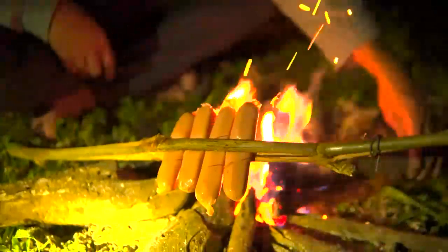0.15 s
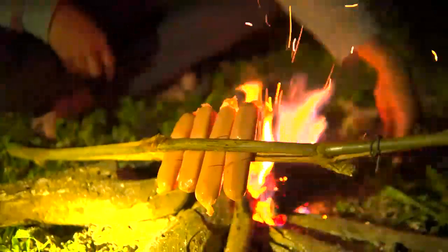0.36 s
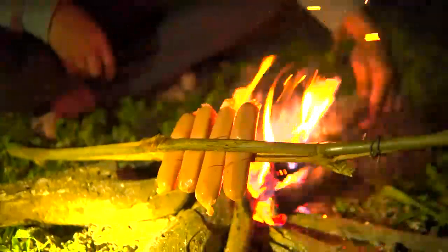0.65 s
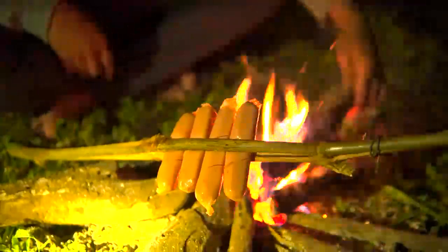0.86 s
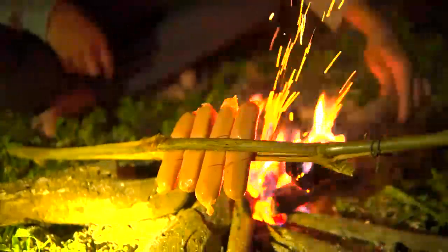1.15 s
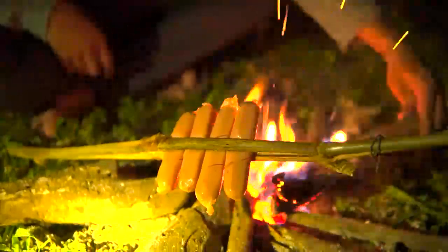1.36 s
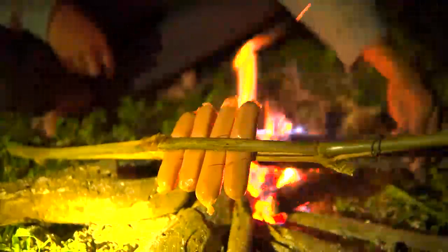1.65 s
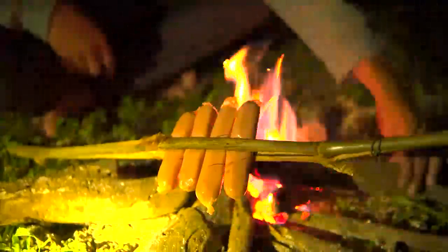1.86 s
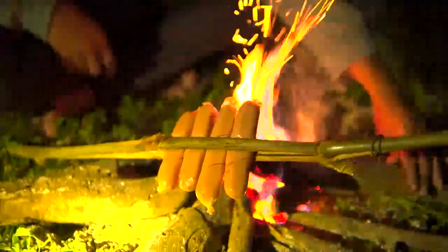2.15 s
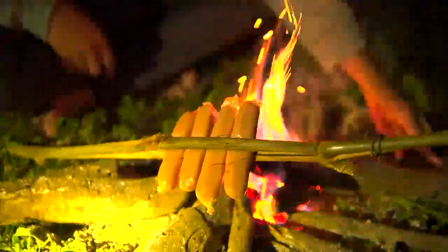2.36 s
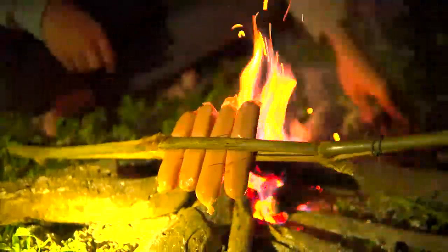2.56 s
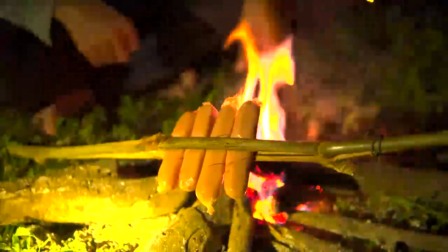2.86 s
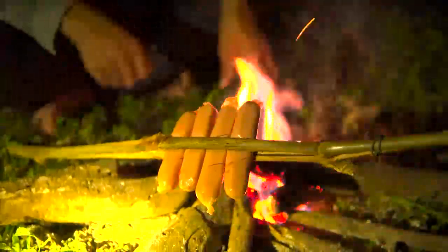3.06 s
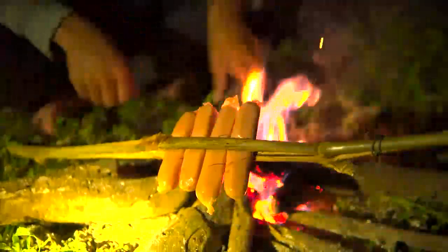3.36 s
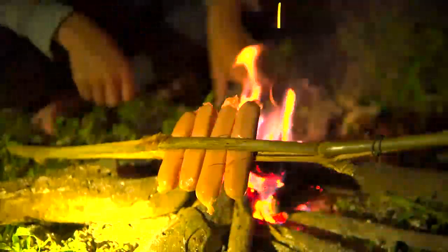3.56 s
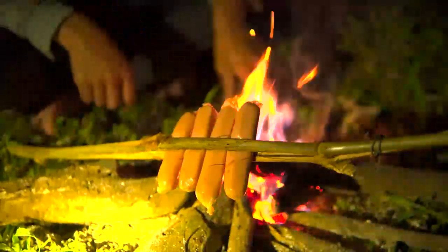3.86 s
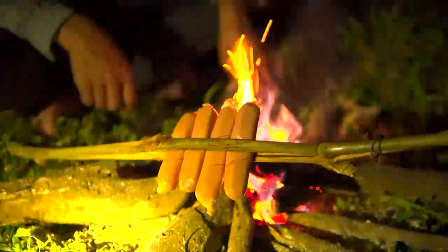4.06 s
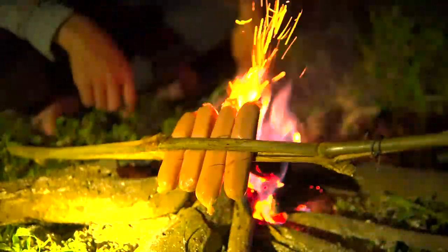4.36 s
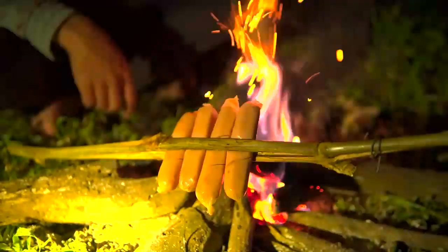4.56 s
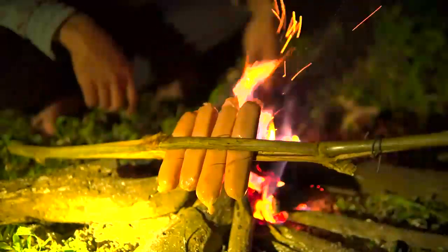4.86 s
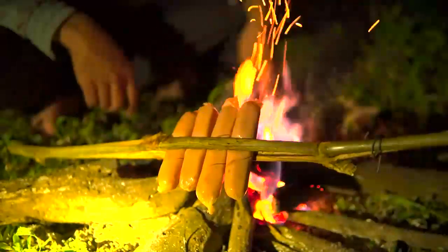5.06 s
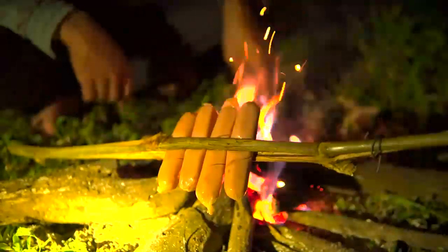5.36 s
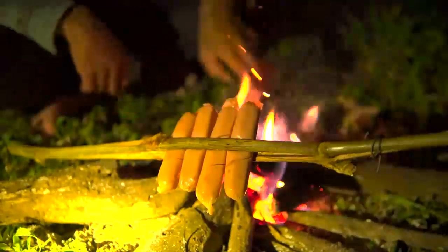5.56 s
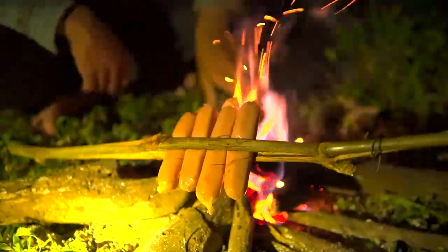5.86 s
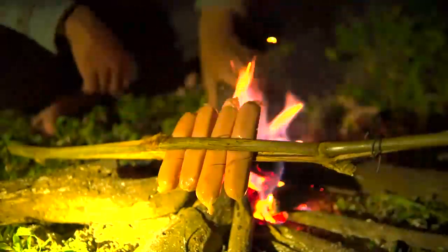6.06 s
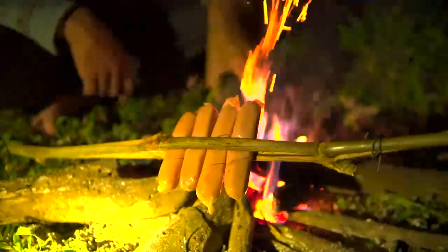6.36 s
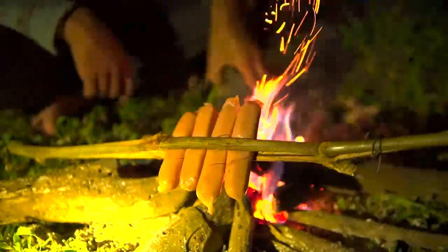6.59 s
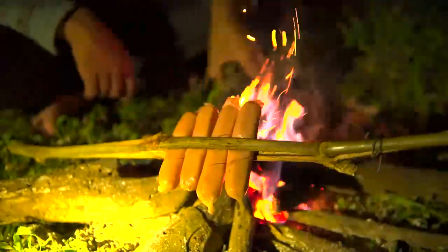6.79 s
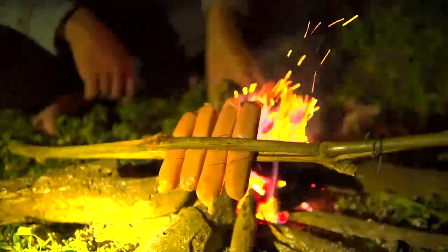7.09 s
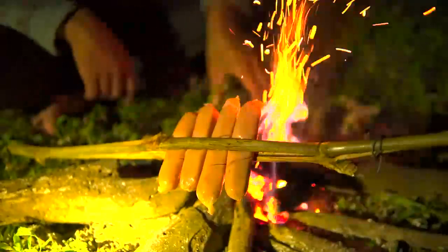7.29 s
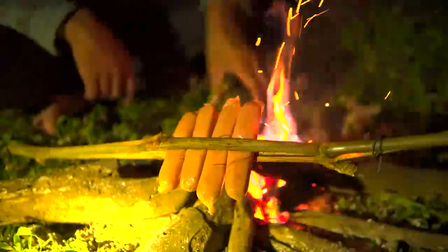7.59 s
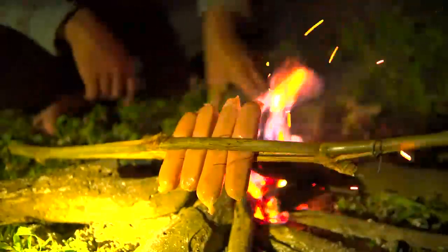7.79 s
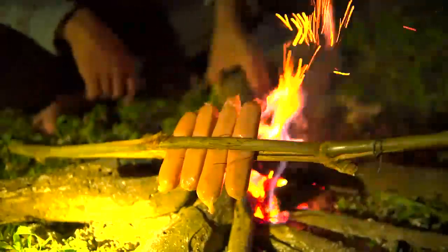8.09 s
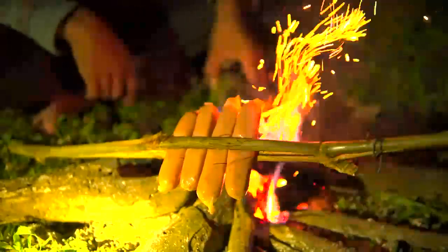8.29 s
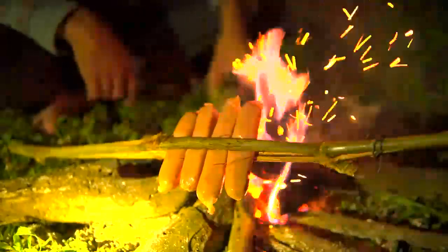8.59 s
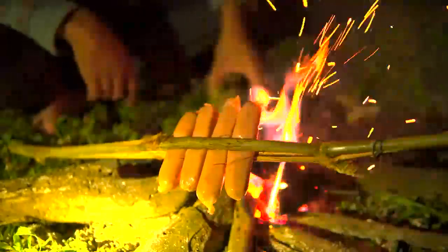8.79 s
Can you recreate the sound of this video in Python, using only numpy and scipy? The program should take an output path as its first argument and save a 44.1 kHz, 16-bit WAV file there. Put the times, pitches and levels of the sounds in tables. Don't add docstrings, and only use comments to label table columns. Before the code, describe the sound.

Small campfire hissing and popping outdoors at night, twigs knocking and sharp snaps flaring up over a continuous pulsing chorus of crickets.

```python
import sys
import numpy as np
from scipy import signal
from scipy.fft import rfft, irfft, next_fast_len
from scipy.io import wavfile
from scipy.ndimage import uniform_filter1d, map_coordinates

SR = 44100
rng = np.random.default_rng(int(sys.argv[2]) if len(sys.argv) > 2 else 0)


def transcribe(u):
    v = np.clip(np.atleast_2d(u).T, -1, 1)
    q = np.round(v * 32767).astype(np.int16)
    wavfile.write(sys.argv[1], SR, q)


def nominal_scale(level):
    x = np.asarray(level, float) / 20
    return 10 ** x


N = 393813
T = np.arange(N) / SR


def unit(x):
    return x / np.sqrt(np.mean(x ** 2) + 1e-20)


def along(points, hz):
    point_hz, point_db = np.transpose(points)
    return np.interp(np.log(hz + 1), np.log(point_hz + 1), point_db)


def curves(rows):
    start_s, *columns = np.transpose(rows)
    return [np.interp(T, start_s, column) for column in columns]


def wobble(rate):
    knots = rng.standard_normal(int(N * rate / SR) + 4)
    return map_coordinates(knots, [T * rate], order=1)


def coloured(x, spectrum):
    size = next_fast_len(N + 8192)
    gain = nominal_scale(along(spectrum, np.fft.rfftfreq(size, 1 / SR)))
    return unit(irfft(rfft(x, size) * gain, size)[..., :N])


def pair(alike):
    a, b = rng.standard_normal((2, N))
    turn = np.arccos(np.clip(alike, 0, 1)) / 2
    shared, apart = np.cos(turn) * a, np.sin(turn) * b
    return np.array([shared + apart, shared - apart])


def strokes(beat, hz, fall_hz, duty, rough_hz, overtone=2, overtone_db=-40):
    along_stroke = np.clip(beat % 1 / duty, 0, 1)
    stroke_number = np.cumsum(np.diff(beat % 1, prepend=0) < 0)
    tune, size, phase = rng.standard_normal((3, 1024))[:, stroke_number]
    pitch = hz + rough_hz * tune - fall_hz * (along_stroke - .5)
    angle = 2 * np.pi * (np.cumsum(pitch) / SR + phase)
    tone = np.sin(angle) + nominal_scale(overtone_db) * np.sin(overtone * angle)
    return nominal_scale(0.61 * size) * np.sin(np.pi * along_stroke) * tone


def chirps(rows, duty):
    beat, gain = np.zeros(N), np.zeros(N)
    for start_s, rate, stroke_db in rows:
        here = (T - start_s) * rate + duty / 2
        on = slice(*np.searchsorted(here, [0, len(stroke_db)]))
        beat[on] = here[on]
        gain[on] = nominal_scale(np.array(stroke_db))[here[on].astype(int)]
    return beat, gain


def swelling(db, count, start_db):
    return db + start_db * .5 ** np.arange(count) + rng.normal(0, 0.12, count)


def placed(x, pan_db, lag, wet_db, t60):
    block = 8192
    tails = rng.standard_normal((12, 2, block)) * nominal_scale(-60 * np.arange(block) / SR / t60)
    tails = rfft(tails / np.linalg.norm(tails, axis=2, keepdims=True), 3 * block)
    count = N // block + 2
    halves = np.pad(x, (block, count * block - N)).reshape(-1, block)
    window = np.sin(np.pi * np.arange(2 * block) / (2 * block))
    pieces = np.hstack([halves[:-1], halves[1:]]) * window
    echoes = irfft(rfft(pieces, 3 * block)[:, None] * tails[np.arange(count) % 12], 3 * block)
    wet = np.zeros((2, count + 2, block))
    for k in range(3):
        wet[:, k:k + count] += echoes[..., k * block:(k + 1) * block].swapaxes(0, 1)
    wet = wet.reshape(2, -1)[:, block:block + N]
    direct = np.array([np.roll(x, round(lag)) * nominal_scale(pan_db / 2), x * nominal_scale(-pan_db / 2)])
    return direct + nominal_scale(wet_db) * wet


# third_stroke_s, end_s, level_db
TREE_CHIRPS = [(0.215, .499, -44.5), (1.069, 1.282, -44), (2.202, 2.534, -45), (3.26, 3.497, -44.5),
               (4.091, 4.278, -45), (4.828, 5.019, -45), (5.477, 5.76, -45.5), (6.3046, 6.443, -44),
               (6.993, 7.325, -46), (8.099, 8.288, -43.5)]


def tree_cricket():
    rate = 41.8
    rows = []
    for third_s, end_s, db in TREE_CHIRPS:
        count = int((end_s - third_s) * rate + 2.6)
        rows.append((third_s - 2 / rate, rate, swelling(db - 0.6, count, -9.0)))
    beat, gain = chirps(rows, duty=0.732)
    song = gain * strokes(beat, 2410, fall_hz=210, duty=.78, rough_hz=6, overtone=3, overtone_db=-20)
    return placed(song, pan_db=-10, lag=0, wet_db=-4, t60=.15)


# third_stroke_s, level_db
FIELD_CHIRPS = [(0.24, -44), (0.565, -41), (0.8838, -41.5), (1.2237, -43), (1.5506, -42), (1.8563, -40.5),
                (2.163, -42.5), (2.4902, -45), (2.8246, -43), (3.157, -44), (3.492, -43.5), (3.8198, -42.5),
                (4.147, -42.5), (4.473, -42), (4.811, -43), (5.1612, -42), (5.4874, -43), (5.8127, -41),
                (6.156, -44), (6.485, -43), (6.821, -42), (7.169, -45), (7.4996, -42.5), (7.8388, -42),
                (8.1453, -46), (8.5034, -43), (8.821, -42.5)]
FIELD_STROKES = [-3.5, -2, 1, 1, 0, -20]


def field_cricket():
    rate = 38
    rows = [(s - 2 / rate + .003, rate, db - 8 + np.array(FIELD_STROKES)) for s, db in FIELD_CHIRPS]
    beat, gain = chirps(rows, duty=.55)
    pitch_hz = 3720 + 130 * np.minimum(beat // 1, 2)
    song = gain * strokes(beat, pitch_hz, fall_hz=1000, duty=0.72, rough_hz=40)
    return placed(song, pan_db=-12, lag=4, wet_db=2, t60=.22)


# first_stroke_s, level_db, stroke_count
BUSH_CHIRPS = [(-.04, -52.5, 7), (0.326, -53.5, 6), (0.699, -55, 7), (1.068, -56, 7), (1.454, -54, 7),
               (1.795, -56, 6), (2.126, -52.5, 7), (2.474, -55, 7), (2.944, -55.5, 5), (3.534, -54.5, 7),
               (3.971, -57, 6), (4.334, -55.5, 7), (4.679, -53.5, 7), (5.04, -53.5, 7), (5.439, -56, 6),
               (5.769, -58, 7), (6.122, -54.5, 7), (6.462, -55, 8), (6.83, -55, 7), (7.18, -55, 8),
               (7.56, -54.5, 7), (7.935, -55.5, 6), (8.249, -55, 7), (8.619, -54.5, 7)]


def bush_cricket():
    rate = 38.6
    rows = [(s, rate, swelling(db + 2.0, round(count), -4.0)) for s, db, count in BUSH_CHIRPS]
    beat, gain = chirps(rows, duty=0.67)
    pitch_hz = 3820 + 25 * np.minimum(beat // 1, 3)
    song = gain * strokes(beat, pitch_hz, fall_hz=420, duty=.75, rough_hz=28, overtone_db=-24)
    song = song + .6 * np.roll(song, round(SR / rate / 2))
    return placed(song, pan_db=-13, lag=1, wet_db=-1, t60=.24) * nominal_scale([[-1], [3]])


# first_stroke_s, level_db
SHRILL_CHIRPS = [(0.061, -66), (0.339, -65), (0.647, -68), (0.972, -55), (1.281, -62), (1.59, -63),
                 (1.904, -68), (2.204, -65), (2.496, -61), (2.81, -70), (3.111, -60), (3.419, -64),
                 (3.745, -62), (4.052, -59), (4.367, -58), (4.682, -64), (4.992, -67), (5.309, -62),
                 (5.615, -65), (5.89, -68), (6.199, -68), (6.51, -65), (6.824, -69), (7.135, -65),
                 (7.471, -59), (7.782, -66), (8.091, -63), (8.379, -61), (8.688, -62)]
SHRILL_STROKES = [-5, 0, 0, 4, 0, 1, 1]


def shrill_cricket():
    rows = [(s, 50, db + 2 + np.array(SHRILL_STROKES)) for s, db in SHRILL_CHIRPS]
    beat, gain = chirps(rows, duty=.6)
    song = gain * strokes(beat, 7240, fall_hz=120, duty=.6, rough_hz=25)
    return placed(song, pan_db=-.6, lag=0, wet_db=-4, t60=.15)


# start_s, level_db
KATYDID_LEVEL = [(0, -56), (.15, -58), (1.2, -57), (2.3, -60), (2.55, -69), (4.5, -65), (5.1, -55.5),
                 (6.5, -60), (8.1, -57.5), (8.45, -67), (8.93, -75)]


def katydid():
    level_db, = curves(KATYDID_LEVEL)
    beat = np.cumsum(81 + .5 * wobble(2)) / SR
    song = strokes(beat, 6710, fall_hz=301.3, duty=0.63, rough_hz=70.2)
    song = nominal_scale(level_db + 1.4 * wobble(11)) * song
    return placed(song, pan_db=-9, lag=2, wet_db=3, t60=.2) * nominal_scale([[-2], [2]])


# start_s, burn_db
BURNING = [(0.0, 3.5), (0.27, 4), (0.62, 4.5), (0.87, 8), (1.3, 2.5), (2.44, 2), (2.9, 5), (3.63, 1.5),
           (4.03, 2), (4.35, 0.5), (4.65, 6.5), (5.22, 6), (5.8, 1), (6.37, 5.5), (6.8, 2), (7.6, 2),
           (8.1, 5), (8.93, 5)]
# middle_s, half_length_s, extra_sizzle_db, rustle_db
FLARE_UPS = [(.2, 0.1, 5, 3.5), (1.812, 0.018, 14.5, 4.5), (1.946, 0.062, 6, 2), (2.925, 0.11, 2, 5),
             (3.867, 0.033, 2, 4), (4.054, 0.17, 13.5, 5), (4.126, 0.05, 3, -5), (4.366, 0.093, 9, 4),
             (4.807, 0.055, 3, 1), (5.153, 0.022, -2, 5), (5.195, 0.043, -7, 5.5), (5.273, 0.069, 3, 3.5),
             (6.432, 0.044, 3.5, 5), (7.075, 0.041, 7, 9), (7.18, 0.12, 3.5, 4), (7.951, 0.079, 3, 2.5),
             (8.083, 0.15, 2, 5.5), (8.438, 0.044, 0, 5.5), (8.588, 0.067, -11, 6.5)]
# pitch_hz, level_db (per Hz)
SIZZLE_COLOUR = [(800, -50), (2000, 7.5), (3300, 7), (5700, -1.5), (7500, 3.5), (9000, 3), (12000, 1.5),
                 (14000, -0.5)]
# pitch_hz, level_db (per Hz)
RUSTLE_COLOUR = [(300, -49), (600, -4), (1100, 6), (1700, 4), (2500, 4), (4000, -5)]
# pitch_hz, level_db (per Hz)
FLAME_COLOUR = [(15, -58), (25, -46.5), (237, -18), (280, -18), (332, -10.5), (510, -7.5), (651, -4),
                (800, -3.5), (1790, -5.5), (2200, 0), (2860, -7.5), (4840, -120)]


def fire():
    burn_db, = curves(BURNING)
    sizzle_db = -63 + burn_db
    flame_db = -59.5 + 0.47 * burn_db
    rustle_gain = np.zeros(N)
    for middle_s, half_s, hiss_db, rustle_db in FLARE_UPS:
        flare = np.exp(-np.abs((T - middle_s) / half_s) ** 2.6)
        sizzle_db = sizzle_db + hiss_db * flare
        rustle_gain = rustle_gain + nominal_scale(3.72 * rustle_db - 75.5) * flare
    sparks = (rng.random(N) < 900 / SR) * nominal_scale(3.6 * np.minimum(rng.exponential(1, N), 4.5))
    grit = uniform_filter1d(sparks, size=30) * pair(alike=1.0)
    sizzle = coloured(pair(alike=1.0) + nominal_scale(-4.5) * unit(grit), SIZZLE_COLOUR)
    rustle = coloured(pair(alike=0.9) * nominal_scale(4.3 * wobble(120)), RUSTLE_COLOUR)
    flame = coloured(pair(alike=0.16) * nominal_scale(0.79 * wobble(25)), FLAME_COLOUR) * nominal_scale([[.5], [-.5]])
    return nominal_scale(sizzle_db + 2.5 * wobble(30)) * sizzle + rustle_gain * rustle + nominal_scale(flame_db) * flame


# pitch_hz, level_db (per Hz)
STEAM_COLOUR = [(350, -65), (1050, -9), (1800, -6), (3100, -1), (4600, 2), (9000, 1)]


def pops(rows, rise_s, fall_s, ragged_db, ring):
    out = np.zeros((2, N + 4096))
    t = np.arange(2048) / SR
    hz = np.fft.rfftfreq(len(t), 1 / SR)
    for start_s, db, top_db, wood_hz, wood_db in rows:
        steam = nominal_scale(along(STEAM_COLOUR + [(12000, top_db + 5.5), (14000, top_db - .6)], hz))
        wood = nominal_scale(wood_db - 29 * np.log2((hz + 1) / wood_hz) ** 2)
        colour = np.hypot(steam, wood)
        rough = np.hypot(steam, np.sqrt(1 - ring) * wood)
        ripple = nominal_scale(1.5 * np.repeat(rng.standard_normal(33), 32)[:len(hz)])
        a, b = irfft(rfft(rng.standard_normal((2, len(t)))) * rough * ripple, len(t))
        a = a + np.sqrt(2 * ring * np.mean(wood ** 2)) * np.cos(2 * np.pi * wood_hz * (t - rise_s))
        fibres = nominal_scale(ragged_db * np.repeat(rng.standard_normal(64), 32))
        rise = np.minimum(t / rise_s, 1) ** 2
        shape = rise * np.exp(-np.maximum(t - rise_s, 0) / fall_s) * fibres
        strength = np.linalg.norm(shape) * np.sqrt(np.mean(colour ** 2)) / np.linalg.norm(shape * a)
        a, b = a * strength, b * strength
        lean_db = rng.normal(0.37, 1) * np.array([[.5], [-.5]])
        sides = np.array([a + 0.49 * b, a - 0.17 * b]) * nominal_scale(lean_db)
        first = round((start_s - .3 * rise_s) * SR)
        out[:, first:first + len(t)] += nominal_scale(db + 1.5) * shape * sides
    no_bass = signal.butter(4, 450, "high", fs=SR, output="sos")
    return signal.sosfilt(no_bass, out[:, :N])


# start_s, level_db (peak, 9 kHz), top_db (12 kHz over it), wood_hz, wood_db (over it)
SNAP_POPS = [(0.144, -32, -8, 2920, -3), (0.846, -35, -14, 2940, 4), (1.2089, -30.5, 1, 3480, -1),
             (1.7745, -35, -11, 2180, 17), (1.8203, -38, -13, 3300, 2), (1.9287, -46, 5, 3100, 15),
             (3.2955, -54, -16, 3420, 24), (3.318, -56, -10, 1280, 19), (3.8553, -40, -14, 2430, 4),
             (4.0192, -32, -13, 3000, 13), (4.0474, -46, 9, 3000, 5), (4.7527, -29, 1, 2500, 10),
             (4.9002, -42, -1, 3180, 5), (5.1365, -50, -13, 1970, 29.5), (5.1485, -50.5, -9, 1590, 28),
             (5.6114, -40, 0, 3520, 14.5), (6.4065, -47, 1, 2580, 14.5), (6.996, -40.5, -11, 3470, 19),
             (7.0531, -42, -15, 3670, 23.5), (7.0795, -35, -16, 3050, 21.5), (7.9157, -41, -14, 1810, 11.5),
             (8.1268, -37, -22, 3060, 1), (8.5705, -45, 1, 3020, 12), (8.9013, -55, -11, 1100, 11)]
# start_s, level_db (peak, 9 kHz), top_db (12 kHz over it)
TICK_POPS = [(0.2652, -36.5, 5.5), (0.7911, -51, -10), (1.5544, -47, 0), (3.6112, -45, -6),
             (3.8352, -48, -13), (3.9773, -42, -12), (4.296, -43, -11), (4.369, -39, -5), (4.564, -47, -2),
             (4.778, -41, -6), (4.832, -38.5, -9), (4.9358, -45, -1), (5.0444, -50, 8), (6.0566, -42.5, 3),
             (8.2028, -43, -18), (8.332, -48, -15), (8.6383, -43, 1), (8.8069, -50, -6), (8.9168, -31, 8)]


def snaps():
    ticks = [(*tick, 2000, -30) for tick in TICK_POPS]
    return pops(SNAP_POPS + ticks, rise_s=.0017, fall_s=0.0013, ragged_db=-2.5, ring=.5)


# start_s, level_db (peak, 9 kHz), top_db (12 kHz over it), wood_hz, wood_db (over it)
TEAR_POPS = [(0.8375, -37, -7, 2640, 13), (0.9487, -50, -4, 5650, 16), (1.7708, -26.5, -7, 2170, 7.5),
             (1.787, -43.5, -11, 3080, 10), (1.81, -48, -13, 3300, -1), (3.941, -48, -9, 9400, 8),
             (4.078, -39, -4, 1360, 3), (4.1075, -40, -10, 3100, -1), (4.1534, -49, -4, 2020, 3),
             (5.1694, -59, -13, 1390, 24), (6.4507, -49.5, -8, 2580, 15), (6.9905, -37.5, -1, 1915, 14.5),
             (7.0239, -50, -3, 2730, 14), (7.0565, -40, -8, 2220, 15), (7.0763, -30.5, -8, 2200, -15),
             (7.088, -37, -17, 1110, 4), (7.0975, -37, -4, 1820, 6), (7.9602, -55, -16, 1900, 21),
             (8.026, -47, -6, 1810, 13), (8.602, -39, -2.5, 2000, -6), (8.6102, -49.5, -1, 1030, 16.5)]


def tears():
    return nominal_scale(1.0) * pops(TEAR_POPS, rise_s=0.0062, fall_s=0.0045, ragged_db=1.5, ring=0.25)


# start_s, level_db (peak), top_db (12 kHz over it)
SPECK_POPS = [(0.3042, -43, -5), (0.8149, -43, -5), (1.5309, -49, -5), (2.0228, -44, -5), (3.5794, -49, -5),
              (3.903, -49, -5), (3.9244, -45, -5), (3.9944, -37, -5), (4.031, -29, -9), (4.0644, -33, -3),
              (4.0964, -34, -5), (4.1344, -43, -5), (4.6159, -39, -3), (4.6718, -50, -5), (5.0624, -47, -5),
              (5.1307, -42, -5), (5.509, -47, -5), (7.7099, -56, -5), (7.7418, -54, -5), (7.8141, -47, -5),
              (7.8905, -48, -5), (8.4058, -42.5, -5), (8.4487, -44, -3), (8.5505, -42, -9)]


def specks():
    rows = [(*speck, 2000, -30) for speck in SPECK_POPS]
    return nominal_scale(-7) * pops(rows, rise_s=0.0013, fall_s=0.0019, ragged_db=3.5, ring=0)


# start_s, level_db (peak, 9 kHz), top_db (12 kHz over it),
# wood_hz, wood_db (over it)
SPIKE_POPS = [
    (1.7752, -39.5, -8, 2960, 27),
    (7.0802, -32, -14, 3000, 4),
]


def spikes():
    return pops(SPIKE_POPS, rise_s=.0003, fall_s=.0005, ragged_db=.1, ring=.8)


# start_s, level_db (peak), pitch_hz, t60_s (time to fade 60 dB)
TWIG_KNOCKS = [(0.524, -55, 152, 0.028), (.785, -50, 282, 0.018), (0.817, -50, 190, 0.034),
               (.849, -63, 130, 0.027), (0.848, -42, 1127, 0.059), (1.72, -37, 1120, 0.014),
               (2.031, -43, 1130, 0.028), (2.055, -45.5, 1170, 0.036), (1.7, -61, 150, .04),
               (2.09, -62, 170, .04), (2.53, -64, 120, .03), (3.44, -65, 129, .03), (3.16, -57, 140, 0.022),
               (3.61, -57, 192, 0.021), (3.93, -50.5, 1065, 0.17), (4.065, -45.5, 1095, 0.17),
               (4.09, -51, 1100, 0.24), (4.154, -50, 1057, 0.14), (5.14, -46, 632, 0.079),
               (5.139, -45, 1475, 0.039), (5.144, -39, 1750, 0.11), (5.147, -51, 1270, .05),
               (5.192, -50.5, 695, 0.11), (5.205, -45, 1730, 0.071), (5.235, -53.5, 600, 0.075),
               (5.246, -49.5, 1670, .05), (7.084, -30, 1174, 0.037), (7.078, -29, 1650, 0.042),
               (8.129, -45, 1085, 0.041), (8.451, -44, 1890, 0.044), (8.45, -48, 1070, 0.044),
               (8.553, -47, 1060, .04), (8.832, -42, 1124, 0.028), (8.916, -30.5, 1095, 0.035),
               (8.917, -31, 1870, 0.023)]


def knocks():
    out = np.zeros(N + SR)
    t = np.arange(SR // 5) / SR
    for start_s, db, hz, t60 in TWIG_KNOCKS:
        drift = np.cumsum(rng.normal(0, 0.07, len(t)))
        envelope = nominal_scale(db - 60 * t / t60) * (1 - np.exp(-t / 0.0022))
        first = round(start_s * SR)
        out[first:first + len(t)] += (envelope * np.sin(2 * np.pi * hz * t + drift))[:len(out) - first]
    return placed(out[:N], pan_db=-0.5, lag=0, wet_db=-14.5, t60=0.32)


def swells(rows):
    return sum(nominal_scale(db) * np.exp(-((T - middle_s) / half_s) ** 2) for middle_s, half_s, db in rows)


# middle_s, half_length_s, level_db
LOG_SCRAPES = [
    (2.34, .04, -71),
    (2.97, 0.039, -71),
    (3.1, .04, -73),
    (8.31, 0.031, -66),
    (8.38, 0.046, -62.5),
    (8.5, 0.037, -61),
    (8.69, 0.056, -68),
    (8.865, .015, -65),
]
# pitch_hz, level_db (per Hz)
LOG_COLOUR = [(700, -36), (1000, -17), (1130, 11), (1280, -12), (1800, -40)]


def hollow_log():
    hum = coloured(pair(alike=1.0) * nominal_scale(2.1 * wobble(45)), LOG_COLOUR)
    return swells(LOG_SCRAPES) * hum


# middle_s, half_length_s, level_db
STEAM_JETS = [
    (3.33, .12, -70),
    (5.28, 0.098, -57),
    (6.6, 0.071, -64),
    (8.6, .03, -60),
    (8.8, .1, -78),
]
# pitch_hz, level_db (per Hz)
JET_COLOUR = [(5000, -30), (8500, -8), (10500, 1), (13000, -2), (15000, -4)]


def steam_jets():
    hiss = coloured(pair(alike=1.0) * nominal_scale(2.2 * wobble(90)), JET_COLOUR)
    return swells(STEAM_JETS) * hiss


def chorus(count, hz, spread_hz, fall_hz, rate, duty, pan_db, overtone_db):
    out = np.zeros((2, N))
    draws = rng.standard_normal((3, count, 3))
    spread = np.sinh(np.linspace(-1.6, 1.6, 3 * count))
    draws[..., 0] = rng.permutation(spread).reshape(3, count)
    for group, side in zip(draws, [-1, 0, 1]):
        songs = np.zeros(N)
        for pitch, pace, start in group:
            beat = T * rate * (1 + .015 * pace) + start % 1
            song = strokes(beat, hz + spread_hz * pitch, fall_hz, duty, rough_hz=hz * .012,
                           overtone_db=overtone_db)
            songs += song * nominal_scale(2.0 * wobble(2.98))
        out += placed(songs, pan_db + 3 * side, lag=3 + side, wet_db=6, t60=0.24)
    return unit(out)


# start_s, high_db, low_db
CHORUS_LEVELS = [(0.0, -48.5, -56), (0.5, -48.5, -54.5), (1.07, -47.5, -57), (1.9, -48.5, -54.5),
                 (2.8, -47.5, -55.5), (3.4, -47, -55), (4.5, -47.5, -55), (5.4, -49, -55.5),
                 (5.9, -48.5, -54.5), (6.64, -48.5, -55.5), (7.0, -47, -55.5), (7.56, -49, -57),
                 (8.11, -48, -56.5), (8.53, -51, -54.5), (8.93, -47.5, -56)]
# start_s, high_late_beats, low_late_beats (below 0 is early)
LEADER_DRAG = [
    (0, -.15, -.13),
    (1.8, -.2, -.22),
    (2.8, -.3, -.14),
    (3.8, -.45, -.08),
    (4.9, -.41, 0),
    (5.7, 0, .04),
    (7.3, 0, -.06),
    (8.93, -.25, -.21),
]


def trills():
    high_db, low_db = curves(CHORUS_LEVELS)
    high_late, low_late = curves(LEADER_DRAG)
    high_beat = T * 32.22 - high_late
    lead_high = strokes(high_beat + .8, 4990, fall_hz=-450, duty=.45, rough_hz=25, overtone_db=-22)
    lead_high = lead_high * nominal_scale(1.3 * wobble(3))
    answer = strokes(high_beat + .3, 4940, fall_hz=-400, duty=.4, rough_hz=40, overtone_db=-20)
    lead_high = lead_high + nominal_scale(-8 + 2.5 * wobble(1.5)) * answer
    lead_low = strokes(T * 65.455 + 0.6 - low_late, 2535, fall_hz=-60, duty=.85, rough_hz=15)
    lead_low = lead_low * nominal_scale(1.3 * wobble(5))
    high = chorus(count=2, hz=4968, spread_hz=85, fall_hz=-300, rate=32.5, duty=.75, pan_db=-3,
                  overtone_db=-20)
    low = chorus(count=1, hz=2534, spread_hz=40, fall_hz=120, rate=48, duty=.85, pan_db=4.5,
                 overtone_db=-37)
    near_high = placed(lead_high, pan_db=-8, lag=3, wet_db=-8, t60=.2)
    near_low = placed(lead_low, pan_db=5, lag=-2, wet_db=-4, t60=.22)
    high_band = high * nominal_scale([[-.8], [.6]]) + nominal_scale(6) * near_high
    low_band = low + nominal_scale(3) * near_low
    return nominal_scale(high_db + 0.46) * high_band + nominal_scale(low_db + 1.0) * low_band


# pitch_hz, level_db (per Hz)
FAR_CRICKETS = [(1500, -30.5), (2100, -0.5), (2450, -29), (2950, -3), (3350, -2.5), (3900, 2), (4350, -4.5),
                (4600, 8), (5000, 9.5), (5350, 1.5), (5700, -2), (6300, -11.5), (9000, -46)]
# pitch_hz, level_db (per Hz)
FAR_KATYDIDS = [(5500, -27), (6100, 1.5), (6450, -3.5), (6750, -2.5), (7250, -4.5), (7700, -8.5),
                (8400, -15), (9800, -40)]


def meadow():
    crickets = nominal_scale(-50.0 + 1.2 * wobble(4.1)) * coloured(pair(alike=0.11), FAR_CRICKETS)
    katydid_db = -57.5 + 1.4 * wobble(7) + 0.74 * wobble(40)
    katydids = nominal_scale(katydid_db) * coloured(pair(alike=0.1), FAR_KATYDIDS)
    return (crickets + katydids) * nominal_scale([[-.7], [.7]])


def scene():
    near_insects = tree_cricket() + field_cricket() + bush_cricket() + shrill_cricket() + katydid()
    crackle = snaps() + tears() + specks() + spikes()
    fireside = fire() + crackle + knocks() + hollow_log() + steam_jets()
    return near_insects + fireside + trills() + meadow()


def top_cut(x):
    return signal.sosfilt(signal.butter(12, 13579.68, fs=SR, output="sos"), x)


def record(dry):
    mid, side = (dry[0] + dry[1]) / 2, (dry[0] - dry[1]) / 2
    below = signal.sosfiltfilt(signal.butter(10, 8300, fs=SR, output="sos"), side)
    side = below + .5 * (side - below)
    return top_cut(np.array([mid + side, mid - side]))


dry = scene()
out = record(dry)
transcribe(out)
```